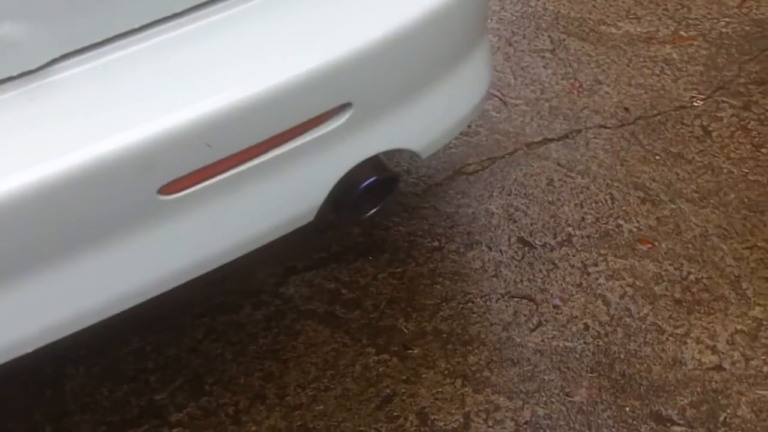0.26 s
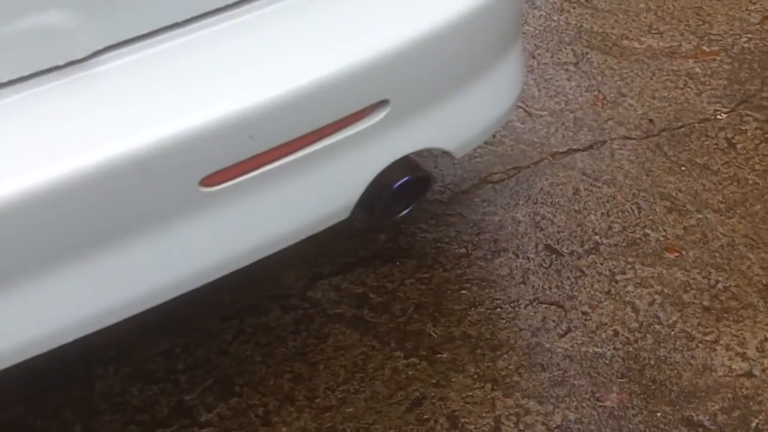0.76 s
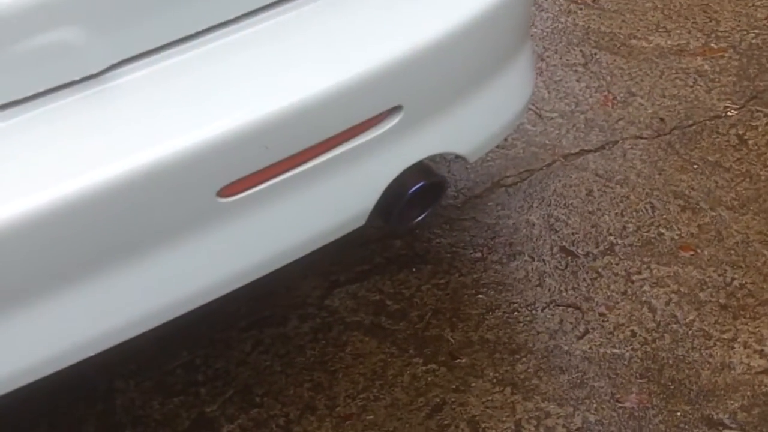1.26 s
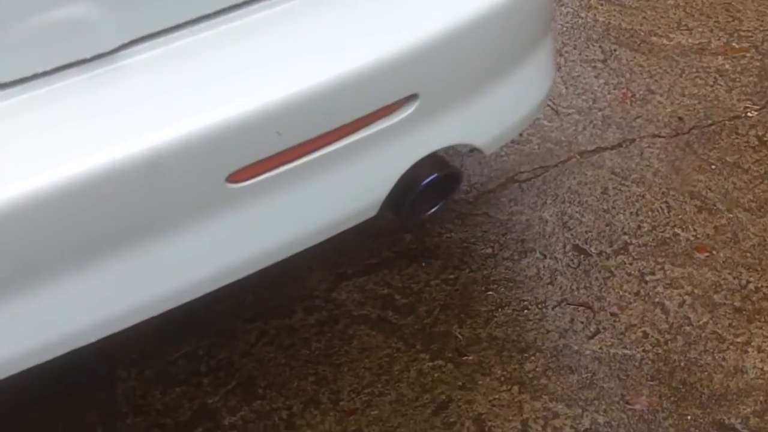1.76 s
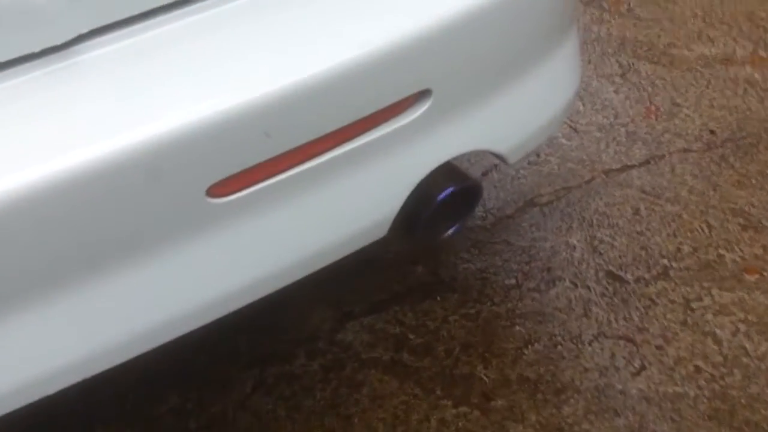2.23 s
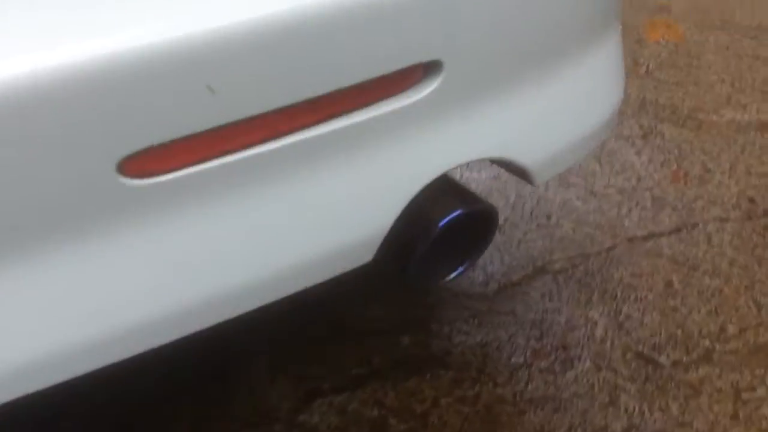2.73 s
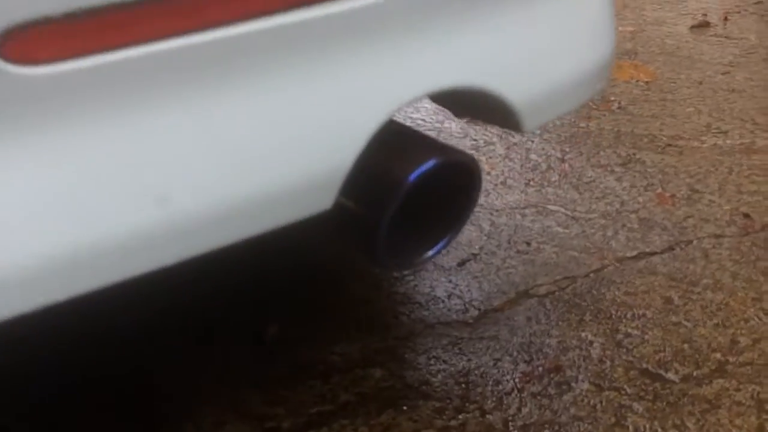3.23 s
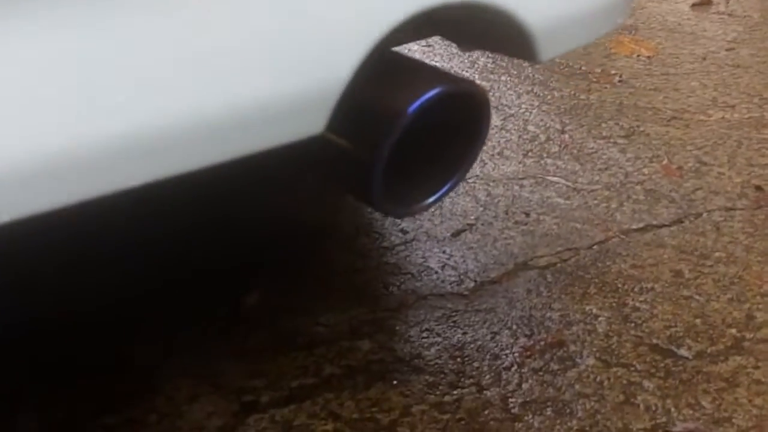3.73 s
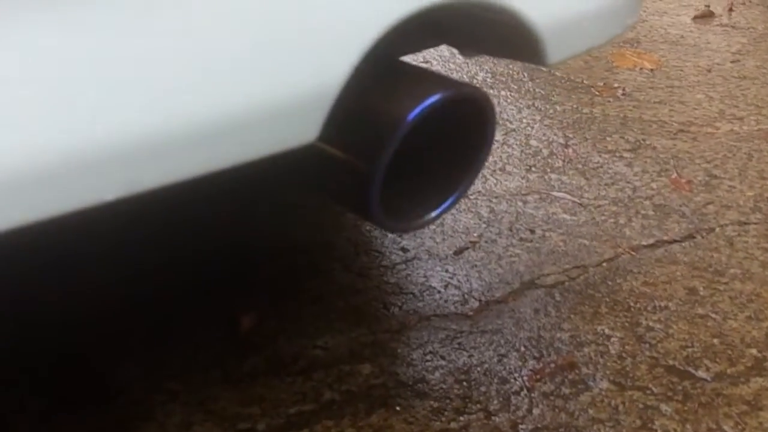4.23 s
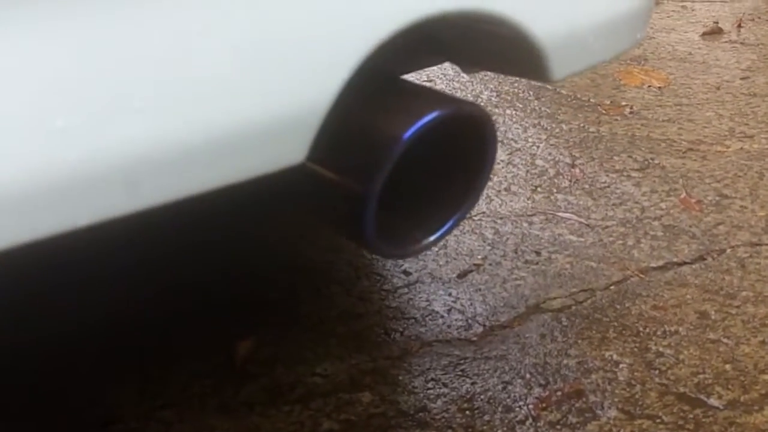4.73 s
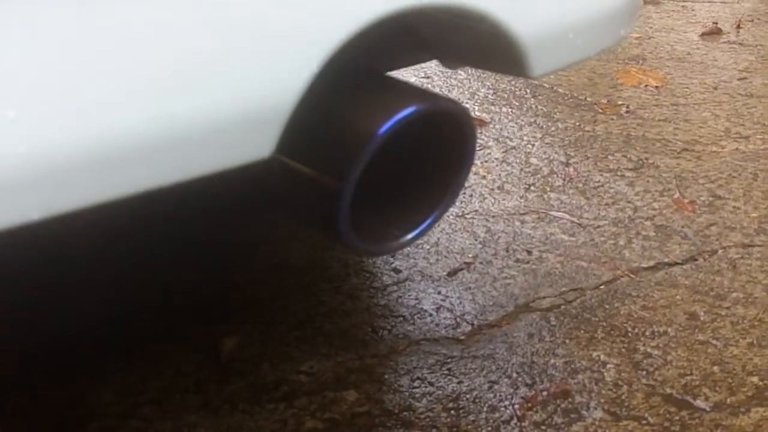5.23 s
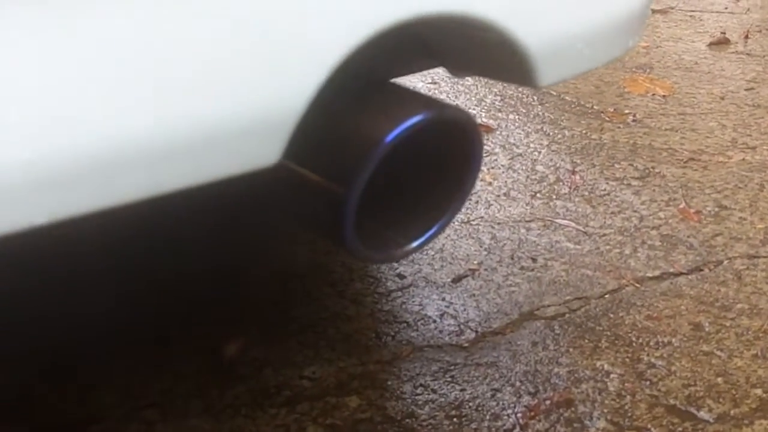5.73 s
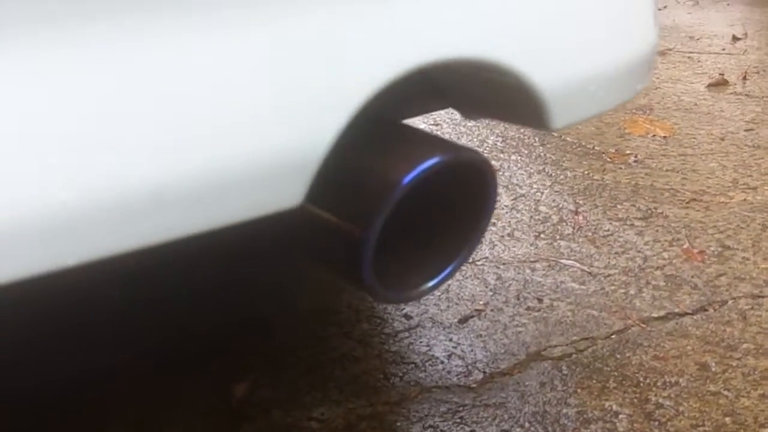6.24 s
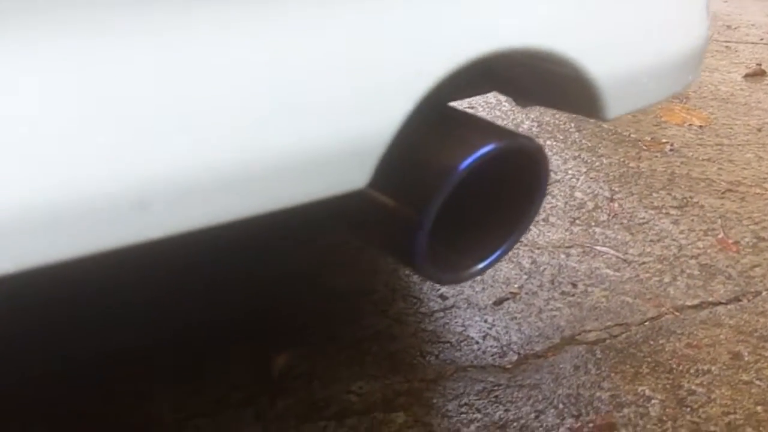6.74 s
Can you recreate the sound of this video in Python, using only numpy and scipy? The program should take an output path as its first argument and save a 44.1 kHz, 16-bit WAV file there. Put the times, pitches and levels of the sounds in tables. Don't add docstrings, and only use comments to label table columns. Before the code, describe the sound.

Outdoors, a dry, bass-heavy, nearly mono microphone sits close behind a car. From 0 to 1 s the engine idles at about 24 deep, soft pulses a second, with engine-bay hiss and a very faint thin whine. At 1.0 s air gasps in, a hard thump and crack follow, and the drone climbs until 1.5 s, then sinks with uneven pulses. A sudden short blip comes at 2.4 s, cut at 2.7 s, with a stumbling, popping fall around 2.9 s. As the microphone nears the pipe, a third blip hits hard at 3.3 s, barks raspily and drops after 3.6 s. At 4.65 s a sharp tick opens the longest, highest rev, loudest in rasp near 4.8 s, peaking at 5.0 s. It coasts down, burbling and hissing, almost to idle by 6.5 s. A few stumbles lead into a last rev at 6.65 s, its rasp swelling until the sound stops at 7 s, still rising.

```python
import sys
import numpy as np
from scipy import signal
from scipy.fft import rfft, irfft, next_fast_len
from scipy.io import wavfile
from scipy.ndimage import uniform_filter1d, map_coordinates

SR = 44100
rng = np.random.default_rng(int(sys.argv[2]) if len(sys.argv) > 2 else 0)


def digitize_waveform(pressure):
    field = np.atleast_2d(pressure).T
    bounded = np.clip(field, -1, 1)
    quanta = np.round(bounded * 32767).astype(np.int16)
    wavfile.write(sys.argv[1], SR, quanta)


def to_linear_factor(level_db):
    exponent = np.asarray(level_db, float) / 20
    return 10 ** exponent


N = 308259
ATTACK_S, RECOVER_S = 0.0068, 0.096


def unit(x):
    return x / np.sqrt(np.mean(x ** 2) + 1e-20)


def along(points, hz):
    f, v = np.transpose(points)
    return np.interp(np.log(hz + 1), np.log(f + 1), v)


def curves(rows):
    s, *cols = np.transpose(rows)
    return [np.interp(np.arange(N) / SR, s, c) for c in cols]


def by_rate(rows, hz):
    f, *cols = np.transpose(rows)
    return [np.interp(hz, f, c) for c in cols]


def coloured(x, points):
    m = 2 * next_fast_len(N // 2 + 4096)
    cep = irfft(np.log(to_linear_factor(along(points, np.fft.rfftfreq(m, 1 / SR)))), m)
    cep[1:m // 2] *= 2
    cep[m // 2 + 1:] = 0
    return irfft(rfft(x, m) * np.exp(rfft(cep)), m)[..., :N]


def per_firing(turns):
    return map_coordinates(rng.standard_normal(int(turns[-1]) + 8), [turns + 2], order=1)


# first hard blow in seconds, its fundamental in dB, hold in seconds,
# fuel cut in seconds, level in dB to which the fundamental has sunk.
BLIPS = [
    (1.036, -11.5, 0.058, 1.507, -28.5),
    (2.399, -14.5, .05, 2.715, -27.5),
    (3.287, -14, .03, 3.59, -36),
    (4.667, -14, 0.067, 5.045, -30.5),
    (6.664, -17.5, 0.13, N / SR + .16, -24.5),
]
# first blow in dB, hardest moment in seconds, its level in dB,
# lift of the foot in seconds, level there in dB.
BARKS = [
    (-60, 1.075, -43, 1.26, -48),
    (-40, 2.42, -38, 2.464, -42),
    (-27.5, 3.26, -27, 3.443, -42),
    (-42, 4.8, -34, 4.92, -40.5),
    (-51.5, 7.015, -36, N / SR + 0.055, -38),
]


def per_blip(shape):
    points = []
    for blip, bark in zip(BLIPS, BARKS):
        points += shape(*blip, *bark)
    return curves(points)[0]


# time in seconds, firing rate in Hz.
SPEED = [(0, 24.2), (1.01, 24.6), (1.11, 33), (1.31, 66), (1.49, 82), (2.365, 40.5), (2.56, 74),
         (2.735, 83.6), (3.262, 59.9), (3.43, 91.5), (3.57, 102.4), (4.61, 48), (4.73, 66), (4.9, 104),
         (5.0, 114), (6.61, 28.3), (6.77, 49.4), (N / SR + .03, 96)]
# firing rate in Hz, lead of the fundamental
PHASE_LEAD = [(24, .015, -.08), (40, .04, -.13), (52, -.01, -.16), (62, -.08, -.24), (80, -.03, -.29),
              (92, .08, -.25), (105, .2, -.15)]
PUFFS_S = [.96, 1.676, 2.841, 3.687, 4.596, 5.108, 6.578]
# time in seconds, crank phase in turns.
LAST_BLOW = (6.983, .5)


def crank():
    flywheel_s, start_turn, blow_turn, puff_turn = .05, -.197, .58, .02
    hz = uniform_filter1d(curves(SPEED)[0], size=round(flywheel_s * SR), mode="nearest")
    shut, wide = by_rate(PHASE_LEAD, hz)
    pushing = per_blip(lambda on, db, held, cut, *_: [
        (on - .03, 0), (on + .01, 1), (cut - .17, 1), (cut - .04, 0)])
    lead = shut + pushing * (wide - shut)
    turns = start_turn + np.cumsum(hz) / SR
    blows = [(on, blow_turn) for on, *_ in BLIPS]
    puffs = [(s, puff_turn) for s in PUFFS_S]
    s, turn = np.transpose(sorted(blows + puffs + [LAST_BLOW]))
    now = (turns + lead)[np.round(s * SR).astype(int)]
    slip = (turn - now + 1 / 2) % 1 - 1 / 2
    turns = turns + curves(list(zip([0, *s], np.unwrap([0, *slip], period=1))))[0]
    acceleration = uniform_filter1d(np.gradient(hz) * SR, size=1500)
    throttle = np.pad(np.clip(acceleration / 70, 0, 1), (1200, 0))[:N]
    return hz, turns, turns + lead, throttle


# start in seconds, end in seconds, loss in dB.
LULLS = [
    (2.363, 2.385, 9.5),
    (4.524, 4.65, 2),
    (6.518, 6.68, 3),
]


def pedal():
    hold_s, kick_s, hush_s = 0.032, 0.045, 0.062
    t = np.arange(N) / SR
    fuel = per_blip(lambda on, db, held, cut, *_: [
        (on - ATTACK_S, 0), (on, 1), (cut, 1), (cut + RECOVER_S, 0)])
    kick = sum((t > on - ATTACK_S) * np.exp(-(t - on - hold_s).clip(0) / kick_s) for on, *_ in BLIPS)
    hush = sum(np.exp(-((t - cut) / hush_s) ** 2) for *_, cut, _ in BLIPS)
    lull_db = sum(db * np.interp(t, [a - .03, a, b, b + ATTACK_S], [0, 1, 1, 0]) for a, b, db in LULLS)
    return fuel, kick, hush, lull_db


# firing rate in Hz, fundamental, octave, upper orders and rasp, all in dB.
SHUT = [(24.2, -17.5, -29.5, -15, -64), (32.2, -18.5, -29.5, -5, -65), (52.4, -18, -33, -1.5, -60.5),
        (61.5, -17.5, -27, -0.5, -53.5), (66.7, -17.5, -24.5, 1.5, -56), (83.8, -18.5, -25.5, 4.5, -46.5),
        (91.5, -19.5, -22.5, 15, -41), (113, -18, -24.5, 13, -40)]
# firing rate in Hz, octave in dB, upper orders in dB.
OPEN = [(30, -11, -0.5), (45.4, -25, 1), (63.4, -27.5, 5), (75, -22.5, 10), (84, -22.5, 16.5),
        (105, -21.5, 21)]


def low_orders(hz):
    fuel, kick, hush, lull_db = pedal()
    one_db, two_db = by_rate(SHUT, hz)[:2]
    cut_db, null_before_s = -25, 0.077
    blow_db = per_blip(lambda on, db, held, cut, null_db, *_: [
        (on - ATTACK_S, db - 3.5), (on + 0.042, db), (on + held, db),
        (cut - null_before_s, null_db), (cut, cut_db), (cut + RECOVER_S, cut_db)])
    octave = np.hypot(to_linear_factor(by_rate(OPEN, hz)[0]), kick * to_linear_factor(blow_db - 3))
    burning = uniform_filter1d(fuel * (1 - hush.clip(0, 1)) ** .5 * (fuel == 1), size=400)
    two_db = two_db + burning * (20 * np.log10(octave) - two_db) - 8 * hush
    return one_db + fuel * (blow_db - one_db) - lull_db, two_db - 1.7 * lull_db


# time in seconds, level in dB.
NEAR = [(0, -4.5), (2, -6), (2.9, -0.5), (3.6, -0.5), (7, 0.5)]


def rasp_levels(hz):
    rasp_db = by_rate(SHUT, hz)[3] + curves(NEAR)[0]

    def left_db(s):
        return rasp_db[min(round(s * SR), N - 1)] - 15.5

    bark_db = per_blip(lambda on, _, held, cut, __, first_db, s, db, lift, lift_db: [
        (on - ATTACK_S, first_db), (s - ATTACK_S / 2, db), (lift, lift_db),
        (lift + .04, lift_db - 6.5), (cut, left_db(cut)), (cut + RECOVER_S, left_db(cut))])
    return rasp_db, bark_db


def upper_orders(hz):
    fuel, kick, hush, lull_db = pedal()
    shut_db, open_db = by_rate(SHUT, hz)[2], by_rate(OPEN, hz)[1]
    usual_bark_db = -44.5
    open_db = open_db + 3 * kick + 0.29 * (rasp_levels(hz)[1] - usual_bark_db)
    return shut_db + fuel * (1 - hush.clip(0, 1)) * (open_db - shut_db) - 0.84 * lull_db


def rasp_level(hz):
    fuel, _, _, lull_db = pedal()
    rasp_db, bark_db = rasp_levels(hz)
    return rasp_db + fuel ** .5 * (bark_db - rasp_db) - 1.2 * lull_db


# frequency in Hz, gain in dB.
SILENCER = [(60, -20.5), (100, -26.5), (135, -29), (200, -34), (240, -45), (280, -59), (315, -54),
            (345, -44), (400, -45), (450, -65.5), (520, -90)]


def drone(hz, turns, first, throttle):
    one_db, two_db = low_orders(hz)
    upper_db, rasp_db = upper_orders(hz), rasp_level(hz)
    x = to_linear_factor(one_db + 0.84 * per_firing(first)) * np.cos(2 * np.pi * first)
    x += to_linear_factor(two_db + per_firing(first)) * np.cos(2 * np.pi * 2 * turns)
    blow = first - .1 * throttle * np.sin(4 * np.pi * (first - turns + 1 / 4))
    for k in range(3, 15):
        flip = 1 if k % 2 else 1 - 2 * throttle
        steeper_db = (k - 3) * (throttle * 3 - 1.5)
        inside = np.clip((310 - k * hz) / 40, 0, 1)
        top_db = 0.83 * rasp_db + 39.5 - 1.0 * (k - 4) - 5 * throttle
        drive_db = inside * (upper_db + steeper_db) + (1 - inside) * top_db
        late = (1 - throttle) * np.clip((k * hz - 130) / 220, 0, .4)
        level = to_linear_factor(along(SILENCER, k * hz) + drive_db + 1.3 * per_firing(first))
        x += flip * level * np.cos(2 * np.pi * (k * blow - late) + .2)
    x += to_linear_factor(one_db - 36.5 + 3 * per_firing(first / 4)) * np.cos(np.pi * first)
    x += to_linear_factor(one_db - 30.5 + 9.9 * per_firing(first / 4)) * np.cos(3 * np.pi * first)
    return np.sqrt(2) * x


# frequency in Hz, level in dB per Hz.
TAILPIPE = [(300, -45), (420, -31), (500, -11.5), (620, -3), (728, -1.5), (936, 0), (1200, -10),
            (1510, -31.5), (1960, -17), (2500, -38), (3500, -57.5)]
# frequency in Hz, level in dB per Hz.
COASTING = [(300, -58.5), (460, -22), (550, 5), (640, 0), (740, -2), (900, -3.5), (1080, -10),
            (1400, -30.5), (1900, -14), (2500, -53)]
# frequency in Hz, level in dB per Hz.
TOP = [(6000, -60.5), (8200, -9), (9500, -4.5), (12500, 9.5), (15000, 3), (16000, -28)]


def rasp(hz, first, throttle):
    place = first - .08 * throttle + (throttle > .5) / 2
    passed = np.diff(np.floor(np.maximum.accumulate(place)), prepend=-1)
    fired = passed * (np.diff(place, prepend=-1) < 1 / 4) > 0
    taps = -1. * fired * np.sqrt(SR / hz) * to_linear_factor((-0.5 + throttle) * per_firing(first))
    gate = np.exp(-(place % 1) / hz / .0055) + .14 + .4 * (1 - throttle)
    puffs = rng.standard_normal(N) * gate / np.sqrt(uniform_filter1d(gate ** 2, size=2500))
    rough = np.clip(.1 + .2 * throttle + (1 - throttle) * (80 - hz).clip(0) / 60, 0, 1)
    blows = np.sqrt(1 - rough) * taps + np.sqrt(rough) * puffs
    loaded, coasting = unit(coloured(blows, TAILPIPE)), unit(coloured(blows, COASTING))
    pipe = throttle * loaded + (1 - throttle) * coasting
    ticks = fired * to_linear_factor(-55 + 4 * rng.standard_normal(N)) * np.sqrt(24 / hz)
    return to_linear_factor(rasp_level(hz)) * pipe + coloured(ticks, TOP)


# time in seconds, peak in dB, click in dB.
CRACKS = [(1.0719, -21.5, -21.5), (1.1044, -29, -28), (1.1546, -33.5, -42), (2.177, -48.5, -31),
          (2.4198, -29.5, -34.5), (2.548, -35.5, -25), (3.2863, -20, -31.5), (4.6632, -43.5, -12.5),
          (4.7267, -33.5, -43), (6.514, -48, -32), (6.605, -43.5, -30), (6.6894, -38, -35),
          (6.714, -38.5, -30)]


def cracks():
    x, clicks, t = np.zeros(N + SR), np.zeros(N), np.arange(3000) / SR
    for s, db, click_db in CRACKS:
        burst = to_linear_factor(db + 0.5 - 60 * t / 0.06) * rng.standard_normal(len(t))
        x[round(s * SR):][:len(t)] += burst
        clicks[round(s * SR)] = to_linear_factor(db + click_db + 13)
    colour = [(300, 4), (900, 7.0), (2500, -8.5), (6500, -10.5), (7900, -34), (9500, -24.0), (15000, -37.5)]
    return coloured(x[:N], colour) + coloured(clicks, TOP)


# time in seconds, pressure step in full scale.
STUMBLES = [(1.663, -0.063), (1.676, 0.093), (1.758, -0.13), (1.815, -0.0094), (2.383, 0.16), (2.553, 0.11),
            (2.841, .07), (2.85, -0.11), (2.892, -0.061), (2.906, .06), (2.929, -.08), (2.986, -0.073),
            (3.0, .05), (1.072, -0.23), (3.287, -.35), (3.297, 0.19), (3.687, 0.16), (4.53, 0.11),
            (4.572, -0.066), (4.597, 0.12), (4.63, .1), (5.108, 0.11), (6.518, -0.014), (6.578, 0.081),
            (6.641, -0.15)]


def stumbles():
    x, t = np.zeros(N + SR), np.arange(-900, 900) / SR / .0026
    push = np.exp(-t ** 2 / 2) - .3 * np.exp(-t ** 2 / 20) - .25 * np.exp(-(t - 2.5) ** 2 / 2)
    for s, step in STUMBLES:
        x[round(s * SR) - 900:][:len(t)] += step * push
    return 1.3 * x[:N]


# time in seconds, level in dB, half length in seconds.
GASPS = [
    (1.004, -43, .022),
    (2.38, -46.5, 0.018),
    (3.251, -45, 0.02),
    (4.65, -50.5, 0.02),
]


def gasps():
    t = np.arange(N) / SR
    swell = sum(to_linear_factor(db) * np.exp(-((t - s) / length) ** 2) for s, db, length in GASPS)
    colour = [(1000, -15.0), (3000, -6.0), (4500, -3.5), (6500, -2.5), (7800, -34.0)]
    return swell * unit(coloured(rng.standard_normal(N), colour))


# time in seconds, bay in dB, jet in dB.
BAY = [(0, 0.5, -8), (1, 1, 3), (2.2, -8, 1), (2.9, -7, 0.5), (3.6, -3, -4), (4.4, -6.5, -3),
       (6.3, -9, -3.5), (7, -4, -3.5)]


def hiss_level(hz):
    fuel, kick, hush, _ = pedal()
    after_cut = np.pad(hush, (round(.09 * SR), 0))[:N]
    jet_db = -51 + 0.2064 * (hz - 75) + 2.5 * after_cut - 2 * fuel
    bay_off_db, jet_off_db = curves(BAY)
    steady = np.hypot(to_linear_factor(-55 + bay_off_db), to_linear_factor(jet_db + jet_off_db + 7.5 * kick ** 2))
    under_rasp = fuel * to_linear_factor(rasp_levels(hz)[1] - 14.5)
    return 20 * np.log10(np.hypot(steady, under_rasp))


# frequency in Hz, level in dB per Hz.
HISS = [(20, 7), (150, 21), (300, 12), (700, 5), (1600, 2), (2760, -2.5), (4270, -1.5), (6240, -2.5),
        (7180, -10), (7900, -28.5), (8500, -19.5), (10500, -20), (12000, -26.5), (13500, -43)]


def hiss(hz, first):
    z = signal.stft(rng.standard_normal(N), nperseg=512)[2]
    field = uniform_filter1d(rng.standard_normal(z.shape), size=8, axis=0)
    field = uniform_filter1d(field, size=10, axis=1)
    noise = signal.istft(z * to_linear_factor(1.1 * unit(field)), nperseg=512)[1][:N]
    beat = 1 + 0.082 * np.cos(2 * np.pi * first)
    return to_linear_factor(hiss_level(hz) + 6) * beat * unit(coloured(noise, HISS))


# frequency in Hz, level in dB.
WHINE = [(5006, -76)]


def whine(hz):
    (tone_hz, db), = WHINE
    drift = np.cumsum(rng.standard_normal(N)) * 0.011
    tone = np.sin(2 * np.pi * tone_hz * np.arange(N) / SR + drift)
    return np.sqrt(2) * to_linear_factor(db + 3.5) * (hz < 25) * tone


def scene():
    hz, turns, first, throttle = crank()
    mono = drone(hz, turns, first, throttle) + rasp(hz, first, throttle) + cracks() + stumbles()
    mono += gasps() + hiss(hz, first) + whine(hz)
    colour = [(30, 20.5), (70, -7.5), (170, -29.5), (550, -31.5), (1300, -37.5), (7000, -41),
              (10000, -46.5), (15000, -54)]
    apart = to_linear_factor(-46.0) * unit(coloured(rng.standard_normal(N), colour))
    apart += to_linear_factor(-60.0) * mono * per_firing(first / 3)
    return np.array([mono + apart, mono - apart])


def band_limit(x):
    return signal.sosfilt(signal.butter(12, 15800, fs=SR, output="sos"), x)


def record(dry):
    x = dry + .0114
    mix = x / (1 + np.abs(x) ** 12) ** (1 / 12)
    return band_limit(mix)


dry = scene()
out = record(dry)
digitize_waveform(out)
```